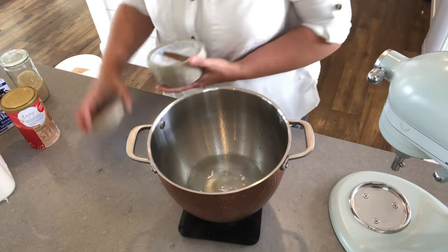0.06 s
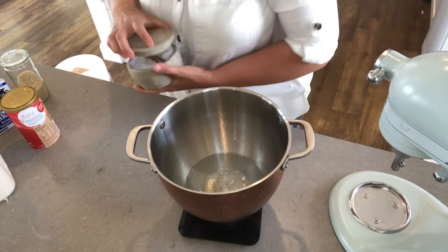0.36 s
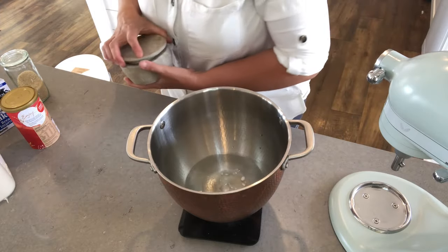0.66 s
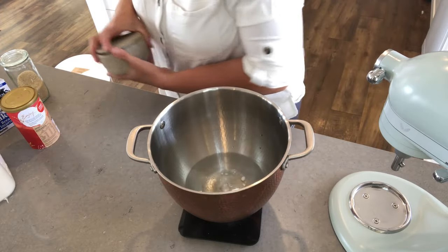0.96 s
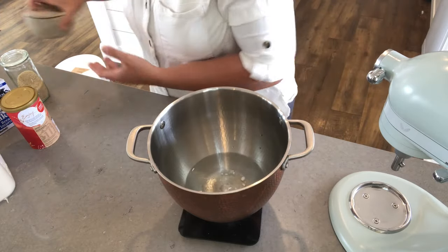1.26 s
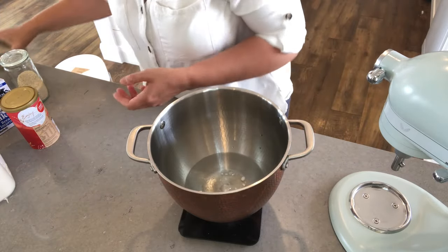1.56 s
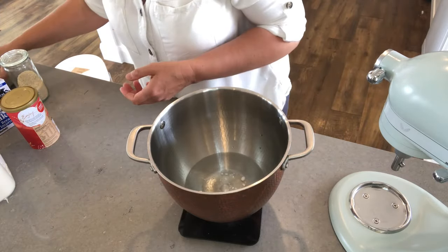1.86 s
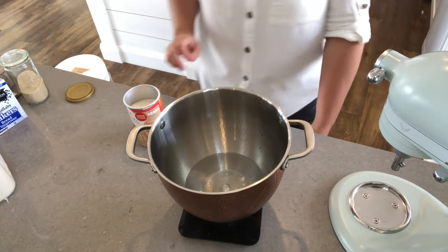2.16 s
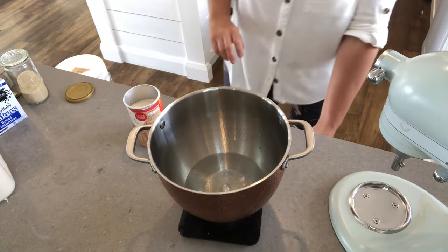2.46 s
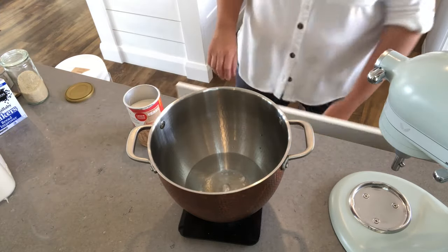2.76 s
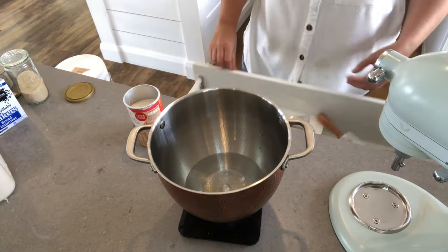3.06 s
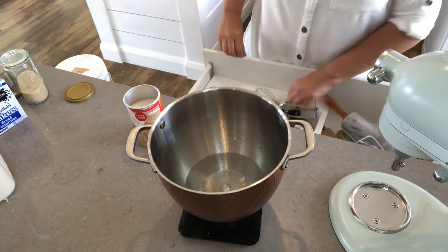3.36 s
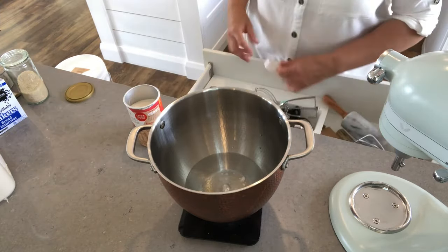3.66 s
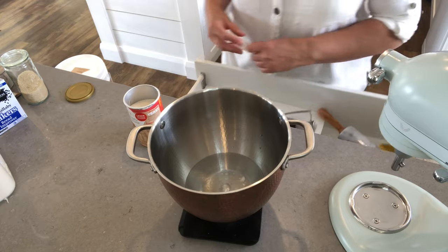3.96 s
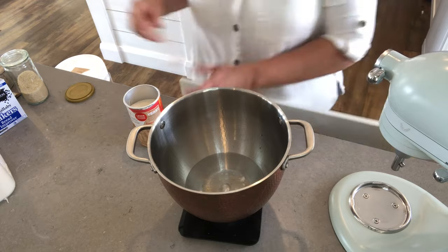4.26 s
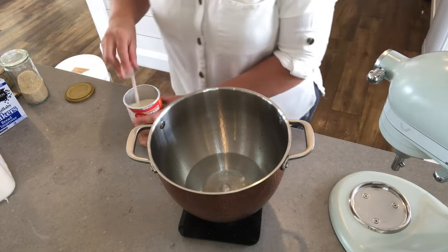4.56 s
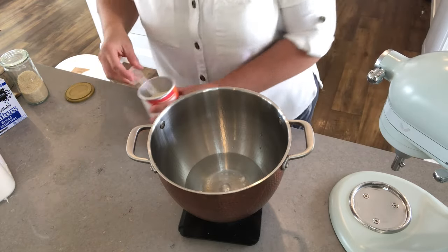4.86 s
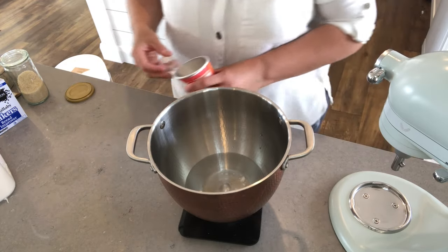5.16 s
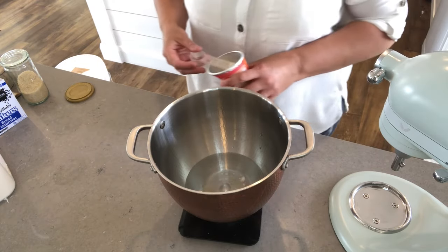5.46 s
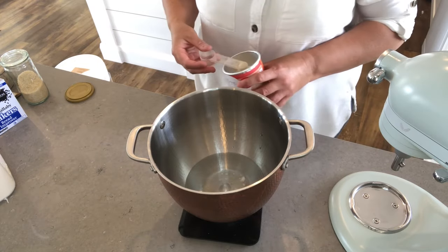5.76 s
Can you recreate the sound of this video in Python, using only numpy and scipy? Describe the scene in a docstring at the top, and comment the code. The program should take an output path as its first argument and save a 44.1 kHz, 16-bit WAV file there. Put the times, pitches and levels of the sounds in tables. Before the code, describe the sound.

A light, hollow spoon tap precedes the quick clatter of two ceramic bowls nesting. They are set down hard on a stone counter, the knock breaking off into a brief chirp. Next a utensil drawer rolls out and back with a low drone, wooden knocks and metallic rattles, and a spoon ticks softly against a tin. Everything is heard from one close position in a slightly echoing kitchen, over a faint appliance hum.

```python
"""Two small ceramic bowls are nested and set down on a stone kitchen bench: each impact excites damped modes of
the rims, the trapped air or the bench. The last knock stops abruptly, and a short dry chirp follows. A utensil
drawer rolls open and shut, its rollers and box in forced vibration, its contents clattering as they rebound. A
spoon taps in a tin. The live room prolongs the impacts by reverberation, and a distant appliance hums."""
import sys
import numpy as np
from scipy import signal
from scipy.fft import rfft, irfft, next_fast_len
from scipy.io import wavfile
from scipy.ndimage import uniform_filter1d, minimum_filter1d, map_coordinates

SR = 44100
rng = np.random.default_rng(int(sys.argv[2]) if len(sys.argv) > 2 else 0)


def inscribe(sig):
    """Save sig as 16-bit PCM at rate SR to the path in sys.argv[1].

    A 1-D sig is mono; a 2-D sig holds one channel per row.
    Samples are clipped to [-1, 1] before scaling.
    """
    pcm = np.round(np.clip(np.atleast_2d(sig).T, -1, 1) * 32767)
    wavfile.write(sys.argv[1], SR, pcm.astype(np.int16))


N = 261072
TIME = np.arange(N) / SR
AGE = TIME[:SR // 2]   # seconds since a blow
BREAK_S = 2.0   # the last knock stops abruptly and the chirp begins

# A bowl drops into another and rocks to rest.
# Each row: start in seconds, rim, air and crack levels in dB, contact cut-off in Hz.
BOWL_CONTACTS = [(0.7362, -29.5, -53, -39.5, 4120), (0.7424, -14, -14.5, -29.5, 3790),
                 (0.7512, -28.5, -29, -22, 2960), (0.757, -9, -16.5, -17, 11000),
                 (0.7712, -14.5, -14.5, -23.5, 14190), (0.7775, -22, -18.5, -30, 12000),
                 (0.8295, -28, -16, -29, 1800), (0.9245, -48, -20, -57, 800)]
# The bowl's foot lands. Each row: start in seconds, bench, scuff and rim levels in dB,
# the scuff's reverberation in dB, contact cut-off in Hz.
LANDINGS = [(-0.06, -48, -21.5, -29, 0.5, 1660), (1.9137, -10, -13, -24, 0.5, 6020),
            (1.9185, -20.5, -13, -19.5, -1, 6000)]
# Pips of the chirp. Each row: start in seconds, level in dB, pitch in Hz, t60 in seconds.
PIPS = [(2.001, -11, 1730, 0.022), (2.0132, -13.5, 1593, 0.035), (2.031, -28, 1673, 0.083),
        (2.0521, -21.5, 2407, 0.075)]
# The drawer's pull, then its push. Each row: time in seconds, roller and box levels in dB.
DRAWER_STROKES = [
    [(2.42, -59, -52), (2.566, -42.5, -34), (2.796, -25, -37), (3.048, -39, -37.5), (3.108, -35.5, -28.5),
     (3.21, -37.5, -42.5), (3.406, -45.5, -34.5), (3.46, -51, -60)],
    [(3.66, -55.5, -50), (3.934, -41.5, -39), (3.978, -40, -52), (4.008, -33.5, -39), (4.294, -34.5, -38),
     (4.326, -29, -39), (4.646, -45.5, -35.5), (4.76, -68, -61)],
]
# The rollers' pitch follows the drawer's speed. Each row: time in seconds, pitch in Hz.
ROLLER_GLIDE = [(2.55, 155.4), (2.8, 206), (2.95, 223.2), (3.2, 225), (3.4, 186), (3.9, 189.6),
                (4.05, 220.3), (4.18, 226), (4.35, 209), (4.6, 172.3)]
# Blows to the drawer. Each row: start in seconds, thud and wood levels in dB.
DRAWER_BLOWS = [(3.088, -22.5, -50), (3.401, -30.5, -42), (3.508, -45, -20.5), (3.587, -52, -37),
                (4.143, -28, -44.5), (4.607, -25.5, -29.5), (4.617, -25, -30)]
# Jolts to the utensils. Each row: start in seconds, clatter and metal levels in dB, metal pitch in Hz.
JOLTS = [(2.626, -40.5, -53.5, 5000), (2.871, -47, -68, 5000), (3.086, -40.5, -48, 6400),
         (3.464, -49, -63, 5600), (3.533, -34, -48, 7430), (3.615, -46, -49, 9550),
         (3.788, -50, -54.5, 4320), (4.143, -50, -56.5, 6880), (4.55, -37.5, -49, 5050),
         (4.585, -36, -47.5, 5250), (4.632, -36.5, -46.5, 3530), (4.660, -39, -50, 5200),
         (4.716, -39, -51, 4500)]
# Spectrum of metal on metal. Each row: multiple of the pitch, relative level in dB.
METAL_SPECTRUM = [(.2, -5), (.55, 1), (1, 0.5), (1.352, -5.5), (2.1, -13.5), (3, -19)]
# Spoon on tin. Each row: start in seconds, note level in dB, pitch in Hz, t60 in seconds, click in dB.
SPOON_TAPS = [(0.5275, -24.5, 872.3, 0.033, -40), (0.597, -44, 880, 0.019, -53),
              (5.896, -35.5, 2400, 0.01, -54)]

# Normal modes. Each row: frequency in Hz, relative level in dB, t60 (time to fall 60 dB) in seconds.
RIM_MODES = [(3160, -16, .07), (3822, -13, .07), (3884, 0, .065), (4045, -5, .065), (4581, -23, .05),
             (4883, -21, .05), (6961, -17, .15), (7284, -25, .11), (8926, -28, .1), (9205, -22, .15),
             (12200, -33, .15), (14770, -42, .1)]   # ceramic walls, in close pairs
AIR_MODES = [(332, -18.5, 0.029), (393, -19, 0.058), (451, -6.5, 0.13), (534.5, 2, 0.093), (600, -5, 0.088),
             (698, -9, 0.06), (880, -11, 0.089)]   # air between the bowls
HELD_RIM_MODES = [(3830, -18, 0.11), (4064, 1.5, 0.045), (6900, -30.5, 0.078), (7400, -31.5, 0.08),
                  (9240, -20.5, .04), (12200, -36.5, .04)]   # a bowl damped by the fingers
BENCH_MODES = [(113, -20.5, 0.16), (176, -10, 0.12), (297, -11, 0.18), (524, -12, 0.46), (603.7, -20, 0.12),
               (878, -1, 0.062), (1170, -20.5, 0.055), (1272, -10.5, 0.093), (1539, -14.5, .07),
               (1848, -7.5, 0.085), (2180, -9.5, 0.034)]   # bench under the bowl's foot
TINNY_MODES = [(3450, -1, 0.027), (4470, -7, 0.04), (5790, -8, 0.031), (7100, -13, 0.023),
               (8600, -6, 0.025), (11700, -13, .025)]   # ring within the chirp's hiss

# Noise spectra. Each row: frequency in Hz, relative level in dB.
CRACK_SPECTRUM = [(150, -21), (400, -2), (900, -7), (1400, -5), (1950, 6), (2700, -8.5), (5000, -23.5),
                  (8000, -35), (12000, -43), (16000, -58.5)]   # bowl striking bowl
GLAZE_SPECTRUM = [(2500, -17.5), (3900, 4.5), (5000, -10), (6000, -25.5), (9000, -13.5), (15000, -29)]
PUFF_SPECTRUM = [(150, -25), (300, -10.5), (440, 1.5), (580, 2), (720, -3.5), (1200, -31.5), (3000, -61.5)]   # air squeezed past the rims
SCUFF_SPECTRUM = [(60, -15), (150, -13.5), (500, 0.5), (1000, 0.5), (2000, -1.5), (2600, -12),
                  (3200, -23.5), (4500, -30), (6000, -42.5), (16000, -69.5)]   # dull contact of foot or spoon
CABINET_SPECTRUM = [(50, -37), (115, -1.5), (330, -0.5), (600, -22.5), (3000, -70.5)]
HISS_SPECTRUM = [(130, 5.5), (250, 7), (700, -6.5), (2200, 9), (4000, -16), (7000, -11), (8700, -22),
                 (10500, -17), (12600, -16), (15000, -28)]   # hiss under the pips
TICK_SPECTRUM = [(200, 0), (2200, -5), (4200, -7), (8700, 3), (12600, -7), (14000, -30)]
RUNNER_SPECTRUM = [(60, -4), (300, 7), (450, -2), (800, -7.5), (1500, -18), (2500, -22), (3500, -55),
                   (8000, -45), (16000, -64)]   # rustling drawer runners
THUD_SPECTRUM = [(20, 1), (40, 16), (70, 2), (120, -2.5), (270, -0.5), (360, -7.5), (450, -4.5), (650, -16),
                 (2000, -51)]   # low thud of the drawer box
WOOD_SPECTRUM = [(130, -21), (250, -5.5), (380, 0.5), (510, 3), (690, 0.5), (930, 1), (1300, -7.5),
                 (2000, -14), (2700, -18), (3500, -32.5), (8000, -41), (16000, -63)]   # knock on its wood
CLATTER_SPECTRUM = [(250, -21), (700, 0), (1300, 6), (2000, 0.5), (2700, -4), (3400, -20.5), (6000, -22.5),
                    (16000, -57)]   # utensils on wood
AMBIENT_SPECTRUM = [(15, -9), (30, -2), (50, -3), (62, -5.5), (80, -15), (115, -16.5), (150, -18),
                    (250, -18.5), (410, -23), (520, -24), (1130, -27.5), (4190, -36), (15500, -38.5)]   # still room air

# The appliance's tones. Each row: frequency in Hz, rms level in dB.
HUM_TONES = [(48.6, -54), (150.5, -65), (204.6, -73.5), (355.5, -65.5), (409, -64)]
# The room's reverberation time. Each row: band centre in Hz, t60 in seconds.
ROOM_DECAY = [(60, 0.33), (150, 1), (300, .85), (550, 1.027), (1200, 1.02), (2200, 1.035), (4000, 0.86),
              (7000, 0.78), (12000, 0.85)]
# Reflections from bench, ceiling and walls. Each row: delay in seconds, level in dB.
REFLECTIONS = [(.011, -13.5), (.034, -15), (.062, -22)]


def nesting_bowls(room):
    """Impact excitation: each touch cracks, rings the rims and thumps the air cavity between the bowls."""
    out = np.zeros(N)
    for s, rim_db, air_db, crack_db, contact_hz in BOWL_CONTACTS:
        walls = chatter(ring(RIM_MODES) * swell(.0003), depth_s=.00002, rate_hz=70)
        grit = amp(-20.5) * burst(GLAZE_SPECTRUM, t60=0.07)
        rim = amp(rim_db) * low_pass(walls + grit, contact_hz, order=1)
        cavity = amp(-1.5) * ring(AIR_MODES)
        puff = amp(-10) * burst(PUFF_SPECTRUM, t60=0.054)
        air = amp(air_db) * (cavity + puff) * swell(0.00051)
        crack = amp(crack_db) * low_pass(burst(CRACK_SPECTRUM, t60=0.0053), contact_hz)
        add(out, s, in_room(rim, room, -6.5) + in_room(air, room, -3.5) + in_room(crack, room, -3))
    return out


def setting_down(room):
    """Action and reaction: a landing rings bowl and bench, and the cabinet below thuds."""
    out = np.zeros(N)
    for s, bench_db, scuff_db, rim_db, wet_db, contact_hz in LANDINGS:
        bench = amp(bench_db) * low_pass(ring(BENCH_MODES) * swell(.0005), contact_hz)
        rim = amp(rim_db) * ring(HELD_RIM_MODES) * swell(0.00069)
        scuff = amp(scuff_db) * low_pass(burst(SCUFF_SPECTRUM, t60=0.026), contact_hz)
        thud = amp(bench_db - 7.5) * burst(CABINET_SPECTRUM, t60=0.049)
        add(out, s, in_room(bench + rim, room, wet_db - 6.5) + in_room(scuff, room, wet_db))
        add(out, s, thud)
    return out * np.interp(TIME, [BREAK_S - .004, BREAK_S + .004], [1, 0])   # breaks off abruptly


def chirp(hold_s=0.058, end_s=2.09):
    """Superposition: damped pips stutter over a tinny hiss and end in a bright tick, all dry."""
    out = np.zeros(N)
    for s, db, hz, t60 in PIPS:
        add(out, s, amp(db) * ring([(hz, 0, t60), (hz * 2.1, -17, t60)]) * swell(0.0012))
    noise = rng.standard_normal(len(AGE))
    tinny = amp(-43) * unit_rms(signal.fftconvolve(noise, ring(TINNY_MODES))[:len(AGE)])
    hiss = amp(-35) * unit_rms(colour(noise, HISS_SPECTRUM))
    add(out, BREAK_S, (hiss + tinny) * decay(np.maximum(AGE - hold_s, 0), t60=0.14))
    tick = amp(-29.5) * burst(TICK_SPECTRUM, t60=0.063) * swell(0.0024)
    add(out, 2.047, tick)
    return out * np.clip((end_s - TIME) / 0.004, 0, 1)


def drawer_roll(room):
    """Forced vibration: rollers drone higher with speed, the box booms and the runners rustle."""
    times, *levels = np.vstack(DRAWER_STROKES).T
    roller_gain, box_gain = (amp(np.interp(TIME, times, db, left=-120, right=-120)) for db in levels)
    box = box_gain * rumble(120, width_hz=28)
    roller_hz = np.interp(TIME, *np.transpose(ROLLER_GLIDE))
    rollers = roller_gain * amp(0.5) * rumble(roller_hz, width_hz=41)
    friction = unit_rms(colour(rng.standard_normal(N), RUNNER_SPECTRUM))
    rustle = (box_gain + roller_gain) * amp(-17.5) * friction
    return box + rollers + in_room(rustle, room, -1.5)[:N]


def drawer_knocks(room):
    """Indirect sound: knocks on the wooden box below the bench top arrive largely by way of the room."""
    thuds, wood = np.zeros((2, N))
    for s, thud_db, wood_db in DRAWER_BLOWS:
        add(thuds, s, amp(thud_db) * burst(THUD_SPECTRUM, t60=0.29))
        add(wood, s, amp(wood_db) * burst(WOOD_SPECTRUM, t60=0.045) * swell(0.0029))
    return (in_room(thuds, room, -2) + in_room(wood, room, 5))[:N]


def utensils(room, ping_t60=0.046):
    """Repeated collision: jolted utensils clatter on wood, and tick and ping against each other."""
    clatter, metal = np.zeros((2, N))
    for s, clatter_db, metal_db, hz in JOLTS:
        ticks = rattle([(multiple * hz, db) for multiple, db in METAL_SPECTRUM])
        ping = amp(-3.5) * ring([(hz, 0, ping_t60), (hz * 1.24, -6, ping_t60)])
        add(clatter, s, amp(clatter_db) * rattle(CLATTER_SPECTRUM) * swell(0.0011))
        add(metal, s, amp(metal_db) * (ticks + ping))
    return (in_room(clatter, room, 4.5) + in_room(metal, room, -0.5))[:N]


def spoon_taps(room):
    """Inharmonic modes: the tin answers the spoon's dull click with one short hollow note."""
    out = np.zeros(N)
    for s, db, hz, t60, click_db in SPOON_TAPS:
        modes = [(hz, 0, t60), (hz * 0.76, -7, t60), (hz * 4.4, -24, t60)]
        note = amp(db) * ring(modes) * swell(0.00043)
        click = amp(click_db) * burst(SCUFF_SPECTRUM, t60=.012)
        add(out, s, in_room(note, room, 1.5) + in_room(click, room, -3.5))
    return out


def kitchen(build_s=0.0032, echo_cut_hz=2500):
    """Reverberation: an impulse response of a few dull echoes and a diffuse tail decaying band by band."""
    t = TIME[:3 * SR // 2]
    white = rfft(rng.standard_normal(len(t)))
    hz = np.fft.rfftfreq(len(t), 1 / SR)
    centres, t60s = np.transpose(ROOM_DECAY)
    bands = [irfft(white * np.interp(hz, centres, share), len(t)) for share in np.eye(len(centres))]
    tail = sum(band * decay(t, t60) for band, t60 in zip(bands, t60s))
    tail *= (1 - np.exp(-t / build_s)) * np.sqrt(np.log(1e6) / SR)   # about unit energy at a t60 of 1 s
    echoes = np.zeros(len(t))
    for s, db in REFLECTIONS:
        echoes[round(s * SR)] = amp(db)
    return tail + low_pass(echoes, echo_cut_hz)


def background():
    """Steady state: an appliance's line spectrum over the continuous spectrum of room air."""
    hum = sum(amp(db) * np.sqrt(2) * np.sin(2 * np.pi * (hz * TIME + rng.random()))
              for hz, db in HUM_TONES)
    return hum + amp(-52) * unit_rms(colour(rng.standard_normal(N), AMBIENT_SPECTRUM))


def ring(modes, spread_db=1.0):
    """Free vibration: damped sines of alternating sign, their levels a little different at each blow."""
    return sum((-1) ** k * amp(db + spread_db * rng.normal())
               * np.sin(2 * np.pi * hz * AGE) * decay(AGE, t60)
               for k, (hz, db, t60) in enumerate(modes))


def chatter(x, depth_s, rate_hz):
    """Phase modulation: touching walls stiffen and slacken at random, which roughens their ring."""
    lag = depth_s * unit_rms(low_pass(rng.standard_normal(len(AGE)), rate_hz))
    return map_coordinates(x, [(AGE + lag) * SR], order=3)


def burst(spectrum, t60):
    """Noise transient: a brief rough contact, with the energy of 10 ms at unit rms."""
    x = colour(rng.standard_normal(len(AGE)) * decay(AGE, t60), spectrum)
    return x * np.sqrt(SR / 100 / np.sum(x ** 2))


def rattle(spectrum, count=4, gap_s=.013, loss_db=4):
    """Inelastic rebound: uneven touches, each weaker than the last, share the energy of one contact."""
    out = np.zeros(N)
    sizes = amp(-loss_db * np.arange(count))
    for k, size in enumerate(sizes / np.linalg.norm(sizes)):
        add(out, gap_s * k * rng.uniform(.75, 1.25), size * burst(spectrum, t60=0.064))
    return out[:len(AGE)]


def rumble(hz, width_hz):
    """Resonance driven by random bumps: narrow-band noise whose centre may glide."""
    shake = low_pass(rng.standard_normal(N) + 1j * rng.standard_normal(N), width_hz / 2)
    power = uniform_filter1d(np.abs(shake) ** 2, size=SR // 6)
    shake /= np.sqrt(power + 1e-12)   # the hand keeps the drive even
    phase = 2 * np.pi * np.cumsum(hz * np.ones(N)) / SR
    return unit_rms(np.real(shake * np.exp(1j * phase)))


def in_room(sound, room, wet_db):
    """Convolution with the room response adds reverberation to the direct sound."""
    out = amp(wet_db) * signal.fftconvolve(sound, room)
    out[:len(sound)] += sound
    return out


def swell(rise_s):
    """Exponential onset of a soft contact."""
    return 1 - np.exp(-AGE / rise_s)


def decay(t, t60):
    """Exponential damping, by 60 dB in t60 seconds."""
    return np.exp(-np.log(1000) * t / t60)


def colour(x, spectrum):
    """Minimum-phase filtering by a (Hz, dB) spectrum, interpolated in log frequency."""
    size = 2 * next_fast_len(len(x))
    hz = np.maximum(np.fft.rfftfreq(size, 1 / SR), 1)
    known_hz, known_db = np.transpose(spectrum)
    gain = amp(np.interp(np.log(hz), np.log(known_hz), known_db))
    cepstrum = irfft(np.log(gain))
    cepstrum[1:size // 2] *= 2   # folding onto positive time makes the filter causal
    cepstrum[size // 2 + 1:] = 0
    return irfft(rfft(x, size) * np.exp(rfft(cepstrum)))[:len(x)]


def low_pass(x, hz, order=2):
    """Maximally flat low-pass filtering."""
    return signal.sosfilt(signal.butter(order, hz, fs=SR, output="sos"), x)


def amp(db):
    """Amplitude ratio from decibels."""
    return 10 ** (np.asarray(db) / 20)


def unit_rms(x):
    """Normalisation to unit rms."""
    return x / np.sqrt(np.mean(np.abs(x) ** 2) + 1e-20)


def add(track, s, sound):
    """Superposition of a sound at s seconds; it may have begun before the track does."""
    start = round(s * SR)
    part = sound[max(-start, 0):max(N - start, 0)]
    track[max(start, 0):max(start, 0) + len(part)] += part


def scene():
    """Linear superposition: all sources sum at one microphone in one room."""
    room = kitchen()
    bowls = nesting_bowls(room) + setting_down(room)
    drawer = drawer_knocks(room) + utensils(room) + drawer_roll(room)
    return (bowls + chirp() + spoon_taps(room) + drawer + background())[None]


def record(dry):
    """Peak limiting ducks the loudest knocks, and a steep low-pass cuts the highest treble."""
    ceiling, window_s, cutoff_hz = .9, .004, 15900
    size = round(window_s * SR)
    gain = ceiling / np.maximum(np.abs(dry), ceiling)
    gain = uniform_filter1d(minimum_filter1d(gain, size=size), size=size)
    return signal.sosfilt(signal.ellip(12, .1, 80, cutoff_hz, fs=SR, output="sos"), dry * gain)


dry = scene()
out = record(dry)
inscribe(out)
```